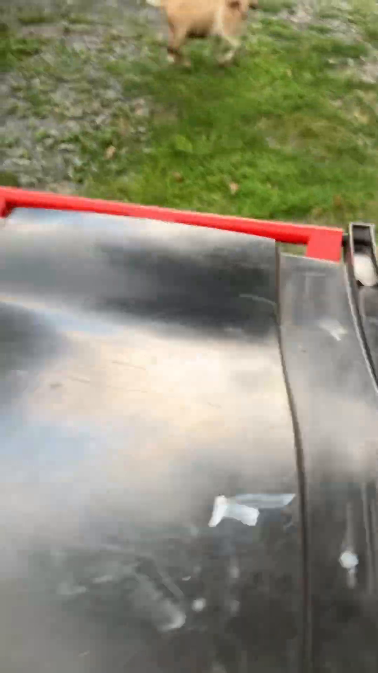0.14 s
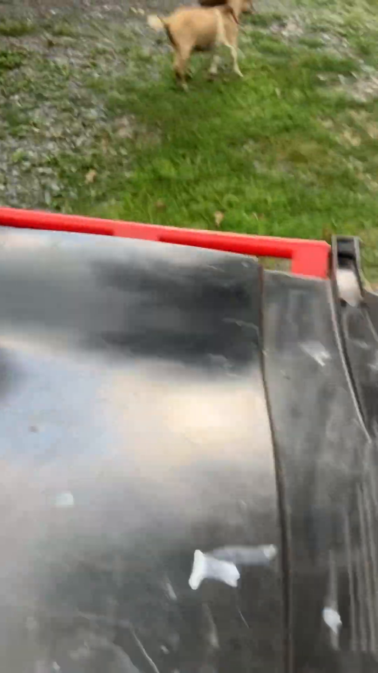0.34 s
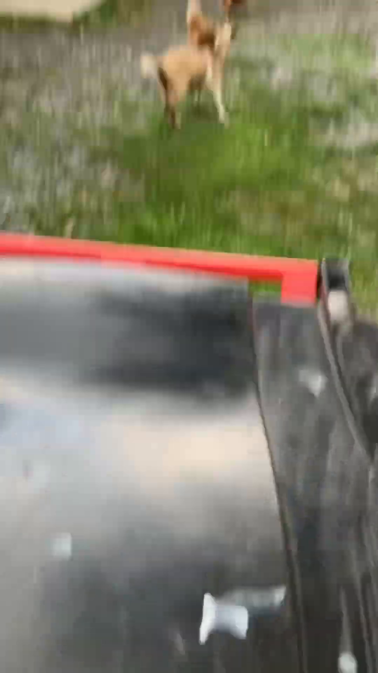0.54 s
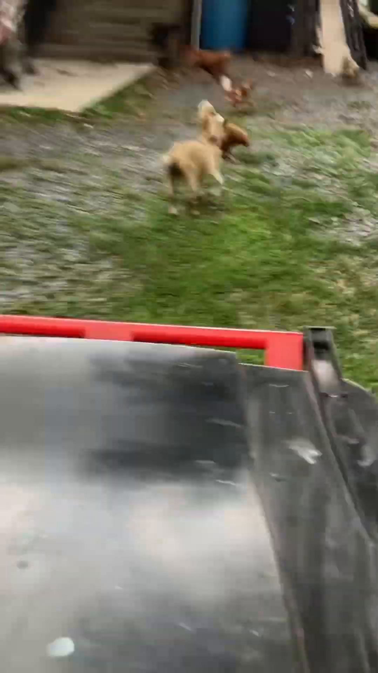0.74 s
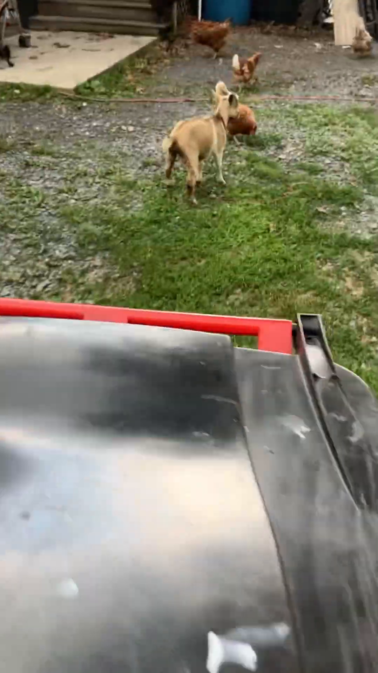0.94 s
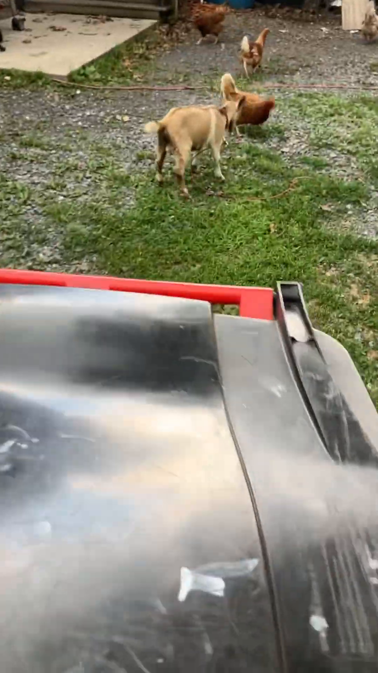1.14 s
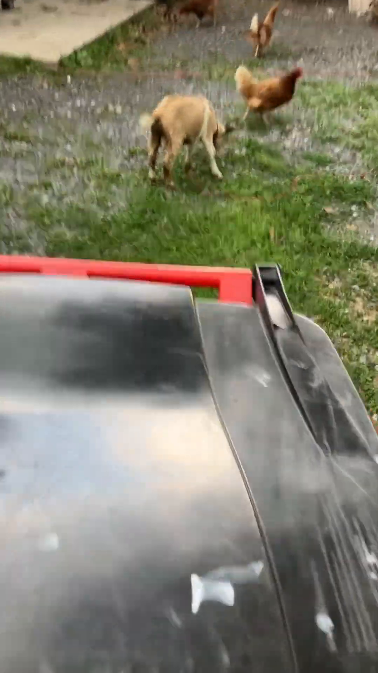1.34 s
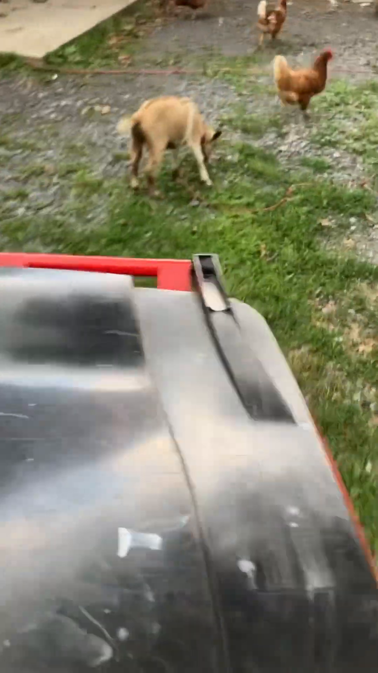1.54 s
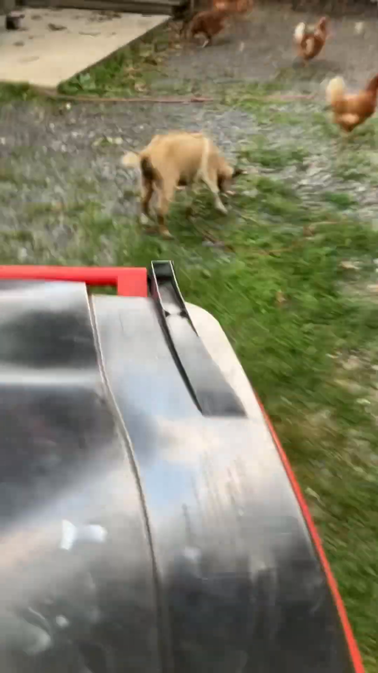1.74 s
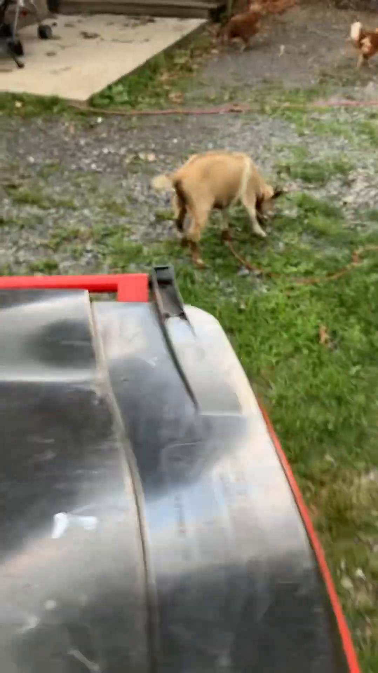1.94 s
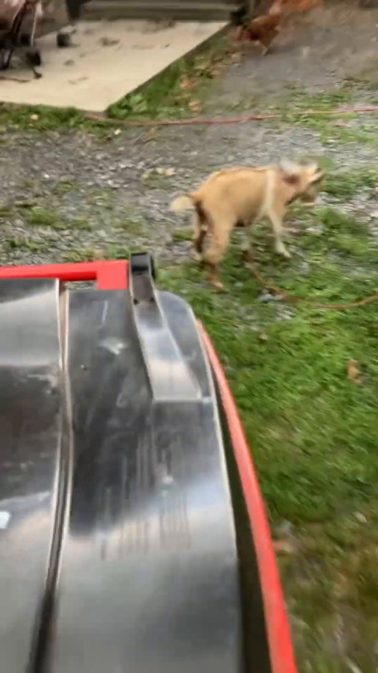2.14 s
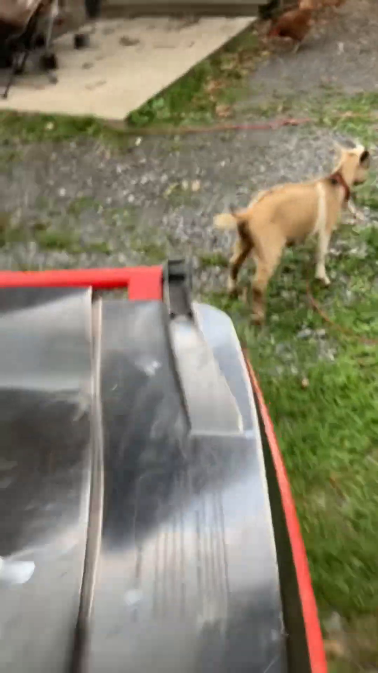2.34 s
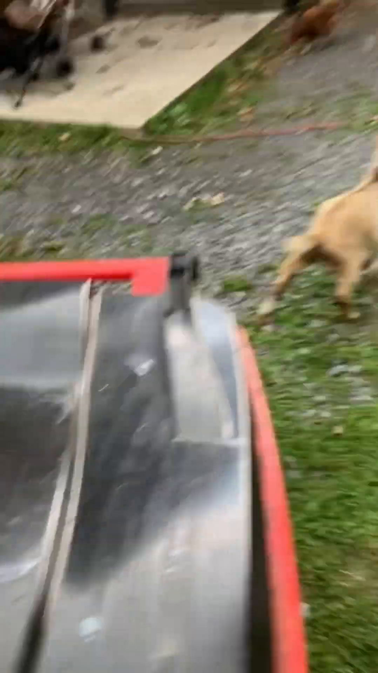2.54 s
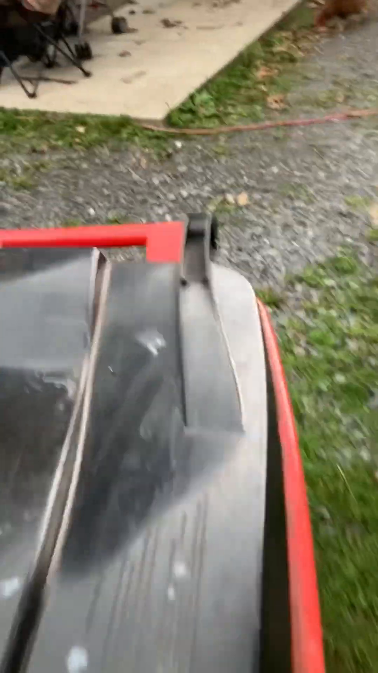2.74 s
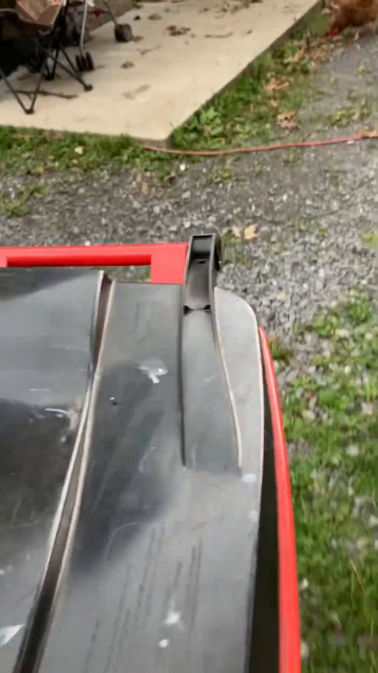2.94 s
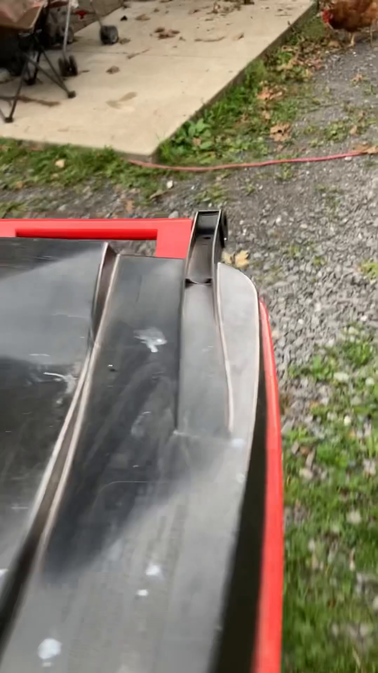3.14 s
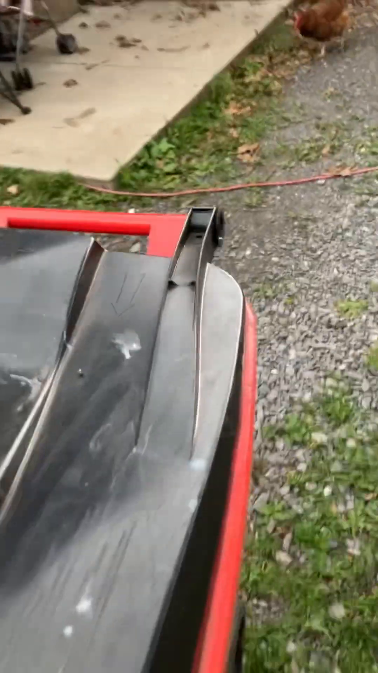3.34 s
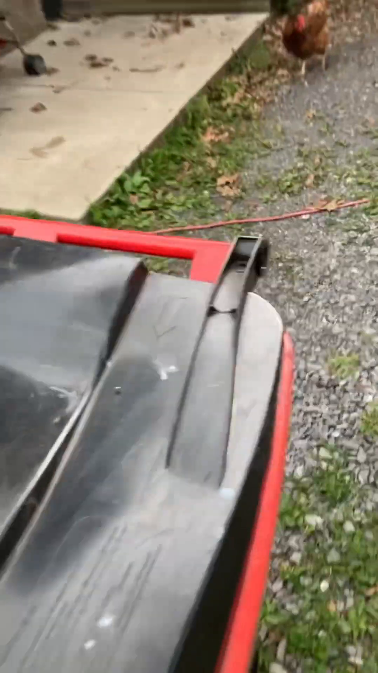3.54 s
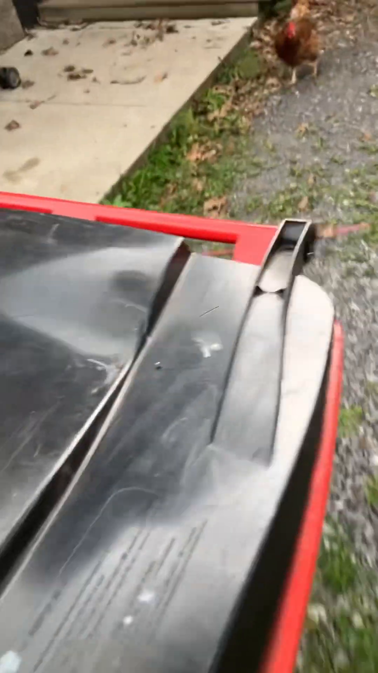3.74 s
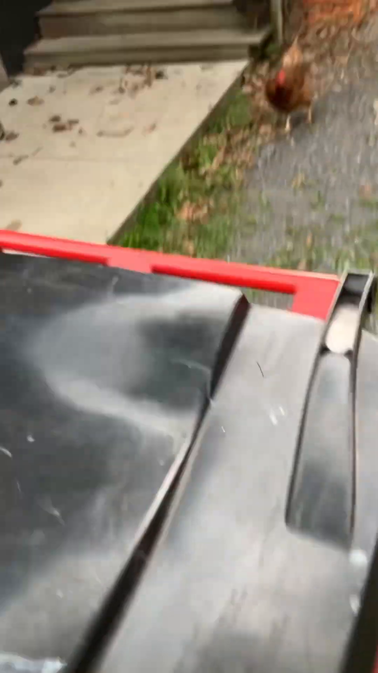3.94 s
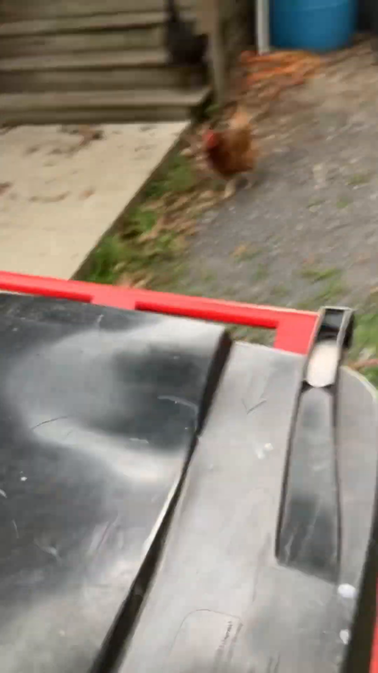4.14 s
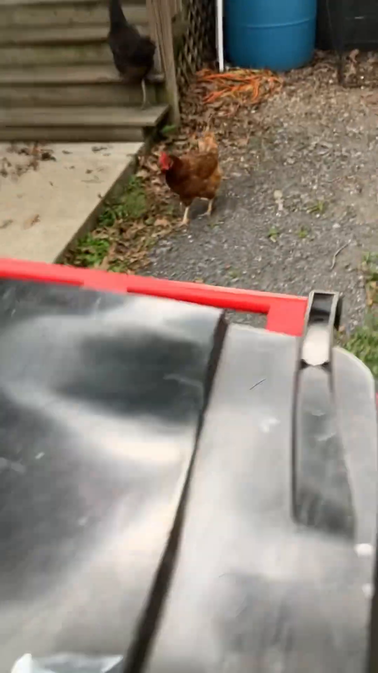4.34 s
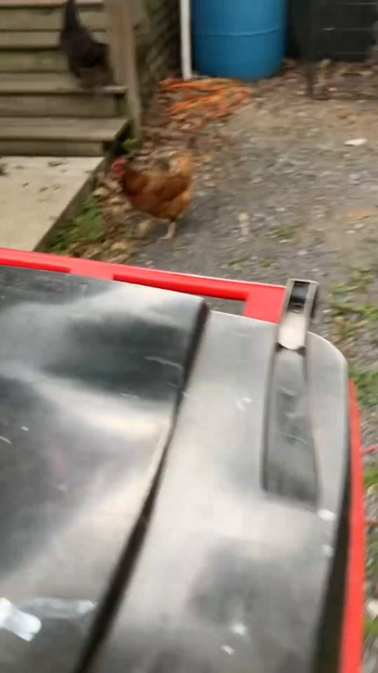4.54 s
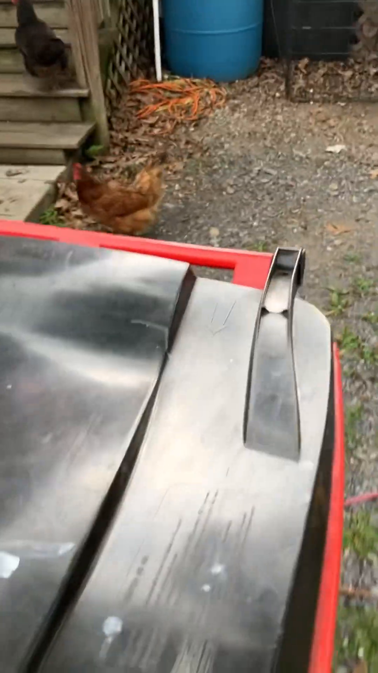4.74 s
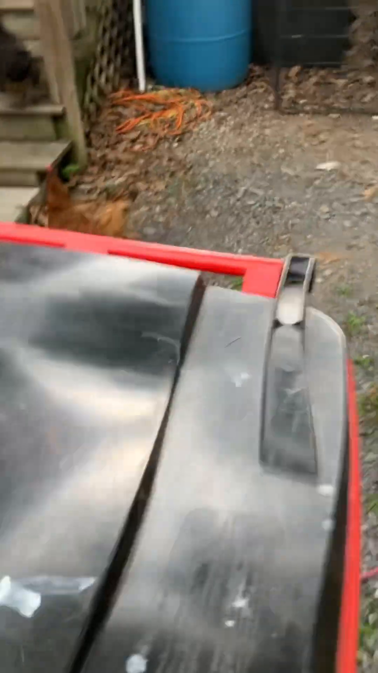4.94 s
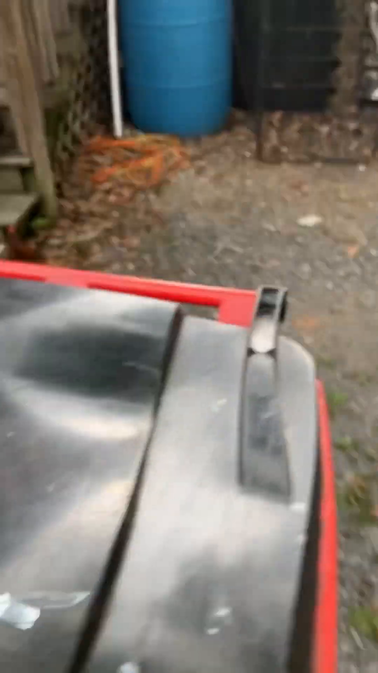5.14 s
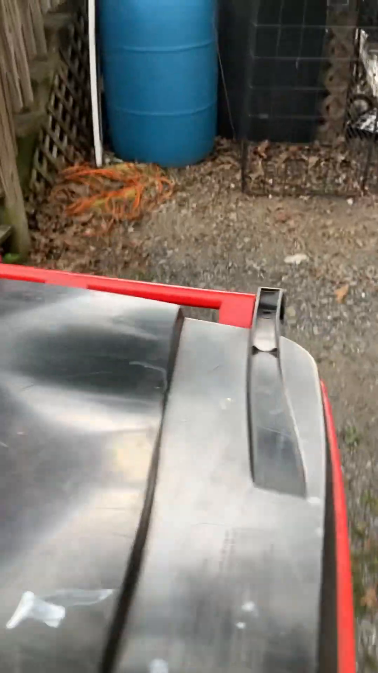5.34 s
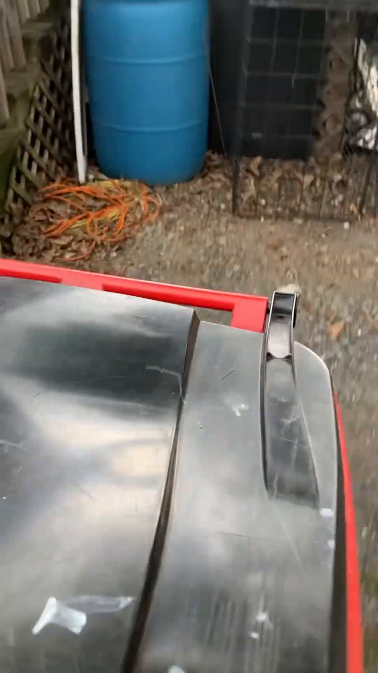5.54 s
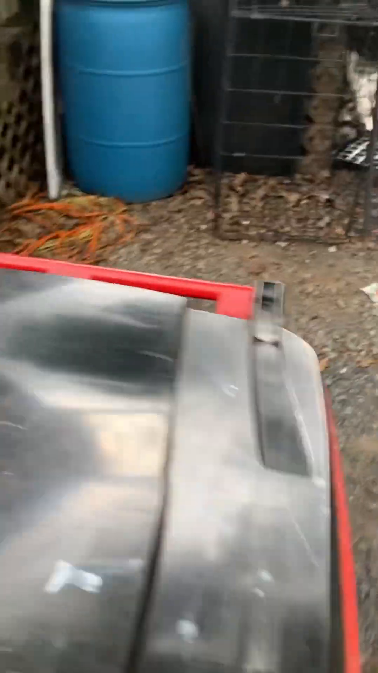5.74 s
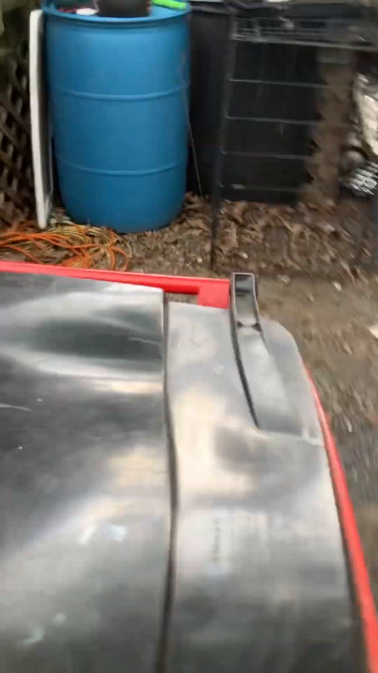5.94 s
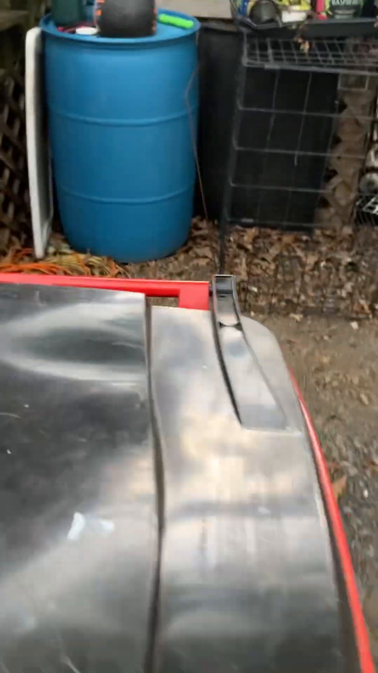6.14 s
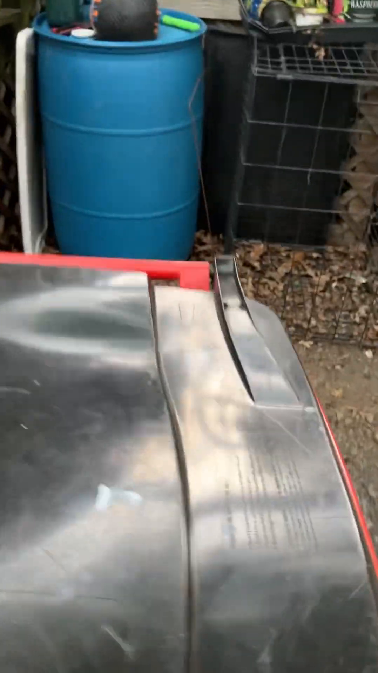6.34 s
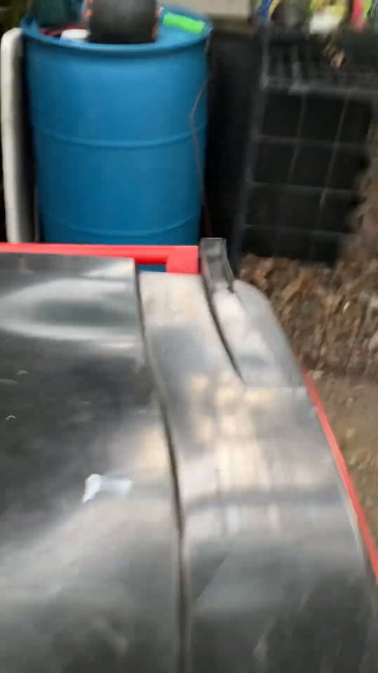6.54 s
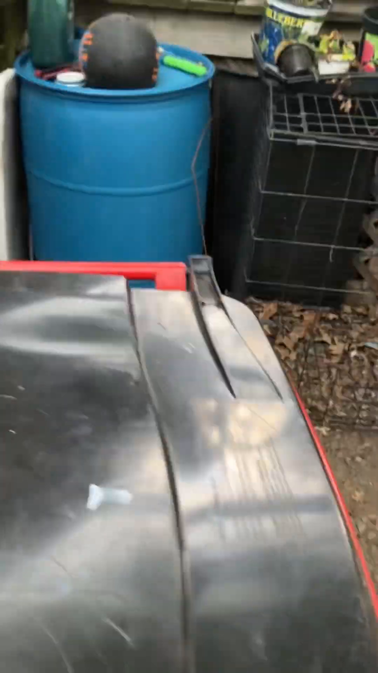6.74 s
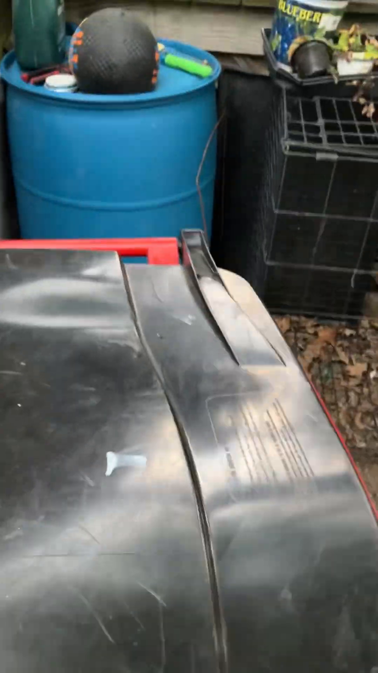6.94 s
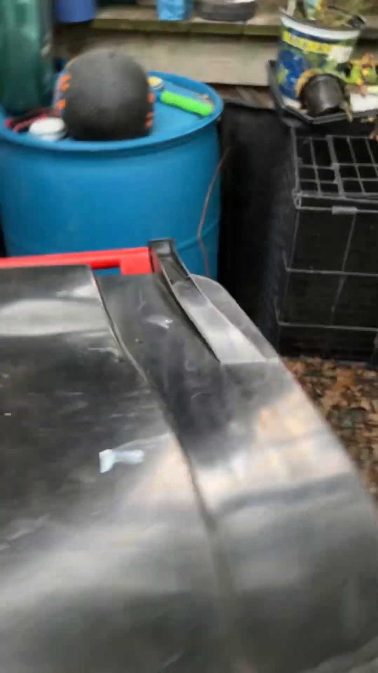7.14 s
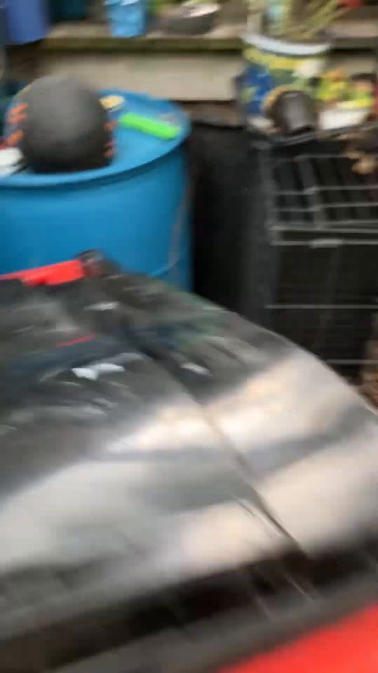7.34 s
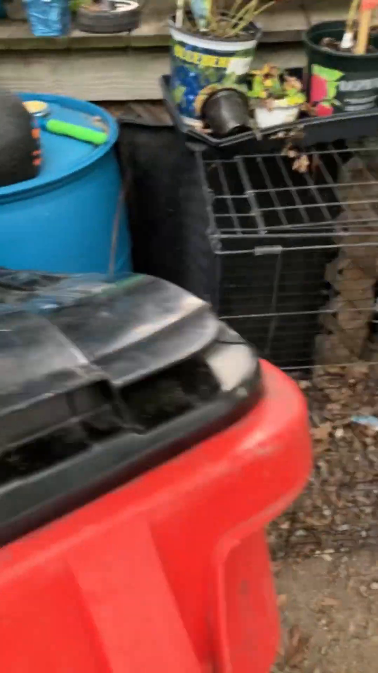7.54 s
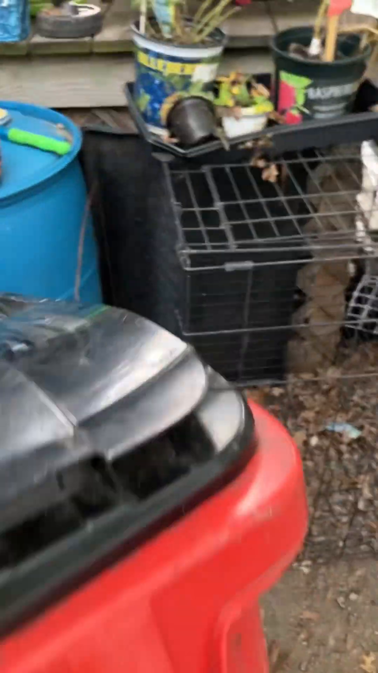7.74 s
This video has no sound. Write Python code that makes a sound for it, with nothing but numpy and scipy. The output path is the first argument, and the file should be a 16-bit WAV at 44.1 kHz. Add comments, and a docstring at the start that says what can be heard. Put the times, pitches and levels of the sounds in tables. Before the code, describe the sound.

Close, boomy rumbling of an empty plastic bin bumping over stones, with lid slaps and gritty crunching, stopping abruptly in a thud.

```python
"""A hollow plastic bin, wheeled over grass and gravel close under a phone, is then tipped upright.
Stones jolt the wheels: random impacts excite wall, air and lid resonances, and loose parts clatter.
Gravel is shaped noise that swells and snaps; lid drops and latch ticks are damped impacts,
and an axle scrape is narrow-band noise. Treble reaches the left of two microphone ports first."""
import sys
import numpy as np
from scipy import signal
from scipy.fft import rfft, irfft, next_fast_len
from scipy.io import wavfile
from scipy.ndimage import uniform_filter1d, map_coordinates

SR = 44100
rng = np.random.default_rng(int(sys.argv[2]) if len(sys.argv) > 2 else 0)


def wav_out(sig):
    """Save sig, one row per channel (or a flat mono array), as 16-bit PCM at SR to the path in sys.argv[1]."""
    wavfile.write(sys.argv[1], SR, np.round(np.clip(np.atleast_2d(sig).T, -1, 1) * 32767).astype(np.int16))


N = 343812


def amp(db):
    """Level definition: the amplitude gain of a level in dB."""
    return 10 ** (np.asarray(db) / 20)


def unit(x):
    """Power normalisation: x at rms 1."""
    return x / np.sqrt(np.mean(x ** 2) + 1e-20)


def evened(x, size):
    """Short-time power normalisation: steady level over spans of size samples, keeping faster grain."""
    power = uniform_filter1d(np.mean(x ** 2, axis=0), size)
    return x / np.sqrt(np.abs(power) + 1e-12)


def along(points, hz):
    """Logarithmic frequency scale: interpolates (f/Hz, value) points along it."""
    f, value = np.transpose(points)
    return np.interp(np.log(hz + 1), np.log(f + 1), value)


def curves(rows):
    """Linear interpolation in time: one curve for each column after t/s."""
    s, *columns = np.transpose(rows)
    return [np.interp(np.arange(N) / SR, s, column) for column in columns]


def wobble(rate):
    """Band-limited random fluctuation: a smooth curve through rate random knots a second."""
    return map_coordinates(rng.standard_normal(400), [np.arange(N) * rate / SR])


def filtered(x, response):
    """Linear filtering: the spectrum of x times a complex response of frequency."""
    m = next_fast_len(N + SR // 2)
    return irfft(rfft(x, m) * response(np.fft.rfftfreq(m, 1 / SR)), m)[..., :N]


def modes(table):
    """Modal superposition: damped resonators summed with alternating sign."""
    def response(f):
        total = 0
        for k, (centre, width, db) in enumerate(table):
            damping = 1j * f * width
            total = total + (-1) ** k * amp(db) * damping / (centre * centre - f * f + damping)
        return total
    return response


def impulses(s, db):
    """Impulsive excitation: one sample of the given level at each time s."""
    return np.bincount((s * SR).astype(int), amp(db), N)


def bursts(strikes, t60):
    """Exponential decay: three independent noises flare at each strike and fall 60 dB in t60 seconds."""
    flare = signal.lfilter([1], [1, -amp(-60 / (t60 * SR))], strikes)
    return flare * rng.standard_normal((3, N))


def jolts(rate, spread_db, t60, smooth):
    """Random impact process: uneven knocks, rate a second, over a smooth share of rubbing noise."""
    draw = rng.random((2, N))
    size = amp(-spread_db * np.log(draw[1] + .008))
    strikes = (draw[0] < rate / SR) * size
    return unit(bursts(strikes, t60)) + smooth * rng.standard_normal((3, N))


def swells(steady_db, s, db, rise, fall):
    """Incoherent power addition: gain of a steady level plus a swell at each s; slopes in dB/s."""
    step = 128
    late = np.arange(0, N, step) / SR - np.asarray(s)[:, None]
    slope_db = np.where(late < 0, rise * late, -fall * late)
    peaks = amp(2 * (db[:, None] + slope_db)).sum(0)
    return np.sqrt(amp(2 * steady_db) + np.interp(np.arange(N), np.arange(0, N, step), peaks))


def pings(start, hz, db, t60, size, loose=0):
    """Damped free vibration: one tone a contact, size samples long, on three channels.
    With loose at 1 the phases on the three channels are unrelated."""
    t = np.arange(size) / SR
    decay = amp(db[:, None] - 60 * t / t60[:, None])
    onset = 1 - np.exp(-t / 0.00029)
    draw = 2 * np.pi * rng.random((len(hz), 4))
    phase = draw[:, :1] + loose * draw[:, 1:]
    where = ((start * SR).astype(int)[:, None] + np.arange(size)).ravel()
    channels = []
    for k in range(3):
        tone = decay * np.sin(2 * np.pi * hz[:, None] * t + phase[:, k:k + 1]) * onset
        channels.append(np.bincount(where, tone.ravel(), N + size)[:N])
    return np.array(channels)


def rung(s, db, tones, scatter_db, t60, size):
    """Repeated modal excitation: each contact rings every tone, its pitch scattered at random."""
    total = 0
    for hz, over_db in tones:
        pitch = hz * amp(scatter_db * rng.standard_normal(len(s)))
        total = total + pings(s, pitch, db + over_db, np.full(len(s), t60), size)
    return total


# coherence of the two ports: f/Hz, share of power common to both [1]
COHERENCE = [(86, .86), (220, .99), (430, .93), (650, .6), (850, .75), (1100, .58), (2500, .5), (5000, .75),
             (7000, .88), (16000, .85)]
# phase lead of the left port over the right: f/Hz, phase/rad
PHASE_LEAD = [(0, -.06), (550, -.1), (2300, 2.4), (3200, 1.7), (5400, 3.2), (8500, 6.28), (14900, 12.56),
              (16000, 13.6)]
# level of the left port over the right: f/Hz, level/dB
LEFT_OVER_RIGHT = [(60, -0.5), (250, -1), (800, -2.5), (2500, 0)]


def ports(three, response):
    """Partial coherence: one noise reaches both ports with a phase gap, the others one port each."""
    common, left, right = three
    side = np.array([[1], [-1]])

    def share(hz):
        return np.clip(along(COHERENCE, hz), 0, 1)

    def gap(hz):
        return np.exp(.5j * side * np.interp(hz, *np.transpose(PHASE_LEAD)))

    def place(hz):
        return response(hz) * amp(side * along(LEFT_OVER_RIGHT, hz) / 2)

    both = filtered(common, lambda hz: place(hz) * gap(hz) * np.sqrt(share(hz)))
    apart = filtered(np.array([left, right]), lambda hz: place(hz) * np.sqrt(1 - share(hz)))
    return both + apart


# steady shaking between bumps, ending in the set-down: t/s, lid level/dB, wall boom level/dB
ROLLING = [(0.0, -20.5, -22), (0.8, -27, -20.5), (0.9, -34.5, -27.5), (1.0, -24.5, -20), (1.4, -24.5, -18),
           (1.95, -30.5, -28.5), (2.3, -18.5, -18.5), (2.6, -27.5, -26.5), (2.85, -19.5, -15),
           (2.93, -29, -25.5), (3.1, -21.5, -19.5), (3.6, -27.5, -24.5), (4.2, -24, -20), (4.6, -33, -24.5),
           (5.0, -22.5, -21.5), (5.28, -29.5, -28), (5.6, -29, -19), (6.0, -25.5, -21.5),
           (6.08, -49, -29.5), (6.2, -29, -22), (7.15, -28, -24), (7.33, -43, -31.5), (7.395, -52.5, -45.5),
           (7.435, -17, -15), (7.8, -86, -45.5)]
# modes of the big panels: f/Hz, width/Hz, relative level/dB
WALL_MODES = [(65, 22.4, 2.5), (84.4, 43.7, -1), (144, 37.7, -7)]


def walls():
    """Panel resonance: the jolts excite the low modes of the walls, which boom."""
    boom_db = curves(ROLLING)[1]
    boom = ports(jolts(rate=180, spread_db=4.0, t60=0.027, smooth=0.78), modes(WALL_MODES))
    return amp(boom_db) * evened(boom, size=4000)


def extra_shaking():
    """Level difference: steady lid shaking in dB over its usual -28 dB."""
    return curves(ROLLING)[0] + 28


# wheels strike larger stones, then the base lands and settles:
# t/s, cavity level/dB, lid level/dB, loose parts level/dB
IMPACTS = [(0, -5.5, -25, -47), (0.077, -10, -16, -25), (0.149, -11.5, -14, -24), (0.271, -17, -24, -34),
           (0.379, -4.5, -14.5, -27.5), (0.616, -9, -16.5, -24.5), (0.777, -14.5, -18.5, -26),
           (0.947, -23.5, -19.0, -31.5), (1.028, -17, -19.5, -42), (1.144, -27, -22, -29),
           (1.287, -16, -21, -29), (1.386, -19, -16.5, -27.5), (1.497, -16, -30, -48),
           (1.658, -15, -39, -35), (2.291, -33, -15.5, -25.5), (2.376, -13, -26, -29),
           (2.556, -38, -21.5, -33.5), (2.709, -4.5, -16.5, -30.5), (2.831, -11.5, -19.5, -28.5),
           (3.007, -15, -17, -26), (3.16, -38.0, -19, -25), (3.256, -14, -18.5, -25),
           (3.356, -12.5, -19.5, -29), (3.483, -21, -28.5, -59), (3.643, -17, -30, -32),
           (3.833, -12.5, -18, -26.5), (4.084, -44, -33, -28), (4.245, -16, -21.5, -50),
           (4.372, -10, -12, -26.5), (4.455, -10, -19.5, -31), (4.642, -15.5, -22, -34.5),
           (4.722, -25, -15, -25.5), (4.907, -14, -15, -26), (4.998, -7, -18.5, -26), (5.04, -9, -38, -46),
           (5.325, -19.5, -26, -41), (5.525, -37, -19, -28.5), (5.603, -14.5, -18.5, -31),
           (5.684, -38, -18.5, -26), (5.764, -12, -18.5, -28), (6.119, -21.5, -24.5, -34),
           (6.258, -11, -19.5, -25), (6.335, -10.5, -21, -27), (6.418, -12, -19.5, -27.5),
           (6.517, -22.5, -22, -34), (6.763, -12, -23.5, -30.5), (7.064, -24, -19, -28),
           (7.391, -59.5, -37, -31), (7.418, -19, -21.5, -23.5), (7.49, -32, -30.5, -51),
           (7.712, -35, -39.5, -44)]
# modes of the enclosed air: f/Hz, width/Hz, relative level/dB
AIR_MODES = [(194.6, 11.08, -1.5), (174, 51.4, -16)]
THRUM_DB, THRUM_GROWS = -26.5, 0.99  # level at the usual shaking; dB per dB of shaking
THUMP_RISE, THUMP_FALL, THUMP_LAG_S = 500, 454, 0.022  # dB/s, dB/s; swell after the bump, s
DRUM_WANDER_HZ, DRUM_ROUGH = 4.525, 0.53  # pitch wander; rubbing added to the ring


def cavity():
    """Cavity resonance: the air mutters unevenly and rings on one wandering note after each bump."""
    s, thump_db, _, _ = np.transpose(IMPACTS)
    hz = AIR_MODES[0][0] + DRUM_WANDER_HZ * wobble(14)
    ring = unit(np.sin(2 * np.pi * np.cumsum(hz) / SR))
    knocking = jolts(rate=180, spread_db=5.0, t60=0.023, smooth=1.0)
    rub = ports(knocking, lambda hz: modes(AIR_MODES)(hz) * hz / (hz + 300j))
    rub = evened(rub, size=4000)
    thumps = swells(np.full(N, -120), s + THUMP_LAG_S, thump_db, THUMP_RISE, THUMP_FALL)
    steady = amp(THRUM_DB + THRUM_GROWS * extra_shaking())
    return steady * rub + thumps * unit(ring + DRUM_ROUGH * rub)


SHAKE_RISE, SHAKE_FALL = 580, 135  # lid and loose parts at a bump, dB/s
# modes of the lid: f/Hz, width/Hz, relative level/dB
LID_MODES = [(281.6, 63, -2), (343.8, 45.7, -0.5), (385.6, 41.6, -1), (481.3, 88.6, -4.5),
             (550.7, 119, -7.5), (858, 155, -14)]


def lid():
    """Plate resonance: random contacts excite the modes of the lid, which rattles."""
    s, _, lid_db, _ = np.transpose(IMPACTS)
    rattle = ports(jolts(rate=300, spread_db=2.0, t60=0.034, smooth=0.92), modes(LID_MODES))
    return swells(curves(ROLLING)[0], s, lid_db, SHAKE_RISE, SHAKE_FALL) * evened(rattle, size=3000)


# spectrum of the loose parts: f/Hz, relative level/dB
CLATTER_COLOUR = [(400, -19), (900, -3.5), (1500, -7.5), (2200, -14.5), (3000, -19.5), (4000, -26.5),
                  (8000, -40), (16000, -78)]


def chatter(clumps, count):
    """Clustered impacts: parts and stones knock in clumps of count; above 900 Hz, the higher the fainter."""
    late, pitch, size, life = rng.random((clumps * count, 4)).T
    clump_start = np.repeat(rng.random(clumps) * N / SR, count)
    when = np.minimum(clump_start - .02 * np.log(late + 1e-9), (N - 1) / SR)  # mean delay about 20 ms
    hz = 600 * amp(18 * pitch)
    db = along(CLATTER_COLOUR, hz) - 3 * np.log(size + .04)
    return ports(pings(when, hz, db, .008 + .022 * life, size=500, loose=1), np.ones_like)


CLATTER_DB, CLATTER_GROWS = -41, 1.3  # level at the usual shaking; dB per dB of shaking


def loose_parts():
    """Multiple impact: shaped noise bursts and clustered pings grow with the shaking."""
    s, _, _, loose_db = np.transpose(IMPACTS)
    knocking = jolts(rate=220, spread_db=0.5, t60=0.034, smooth=0.6)
    noise = ports(knocking, lambda hz: amp(along(CLATTER_COLOUR, hz)))
    clatter = unit(noise) + amp(4) * unit(chatter(clumps=500, count=10))
    steady_db = CLATTER_DB + CLATTER_GROWS * extra_shaking()
    return swells(steady_db, s, loose_db, SHAKE_RISE, SHAKE_FALL) * evened(clatter, size=3000)


# gravel shifts under wheel or shoe: t/s, level/dB before a random wander
SHIFTS = [(0.036, -40), (0.157, -40), (1.124, -45), (1.575, -38), (1.702, -38), (2.607, -46.5),
          (2.772, -42.5), (3.697, -44.5), (4.21, -42.5), (4.615, -39), (4.743, -37), (5.275, -42),
          (5.885, -46), (6.59, -43.5), (6.777, -40.5), (6.937, -36), (7.052, -40.5), (7.396, -41.5),
          (7.715, -52)]
# spectrum of grinding gravel: f/Hz, relative level/dB
GRIT_COLOUR = [(800, -59), (2500, 2.5), (5000, -5), (8500, 3.5), (11500, -4.5), (16000, -6.5)]
CRUNCH_DB, CRUNCH_GROWS = -55, 0.1  # level at the usual shaking; dB per dB of shaking
SCUFF_RISE, SCUFF_FALL = 380, 190  # dB/s
STOP_S, STILL_DB = 7.45, -5  # the bin stands and the steady gravel quietens


def gravel():
    """Granular friction: dense impacts of stones grind and swell under wheels and shoes."""
    steady_db = CRUNCH_DB + CRUNCH_GROWS * extra_shaking()
    steady_db = steady_db + STILL_DB * (np.arange(N) > STOP_S * SR)
    crunch = swells(steady_db, *np.transpose(SHIFTS), SCUFF_RISE, SCUFF_FALL)
    crunch = crunch * amp(1.66 * wobble(4.3))
    stones = evened(jolts(rate=200, spread_db=2.5, t60=0.019, smooth=0.86), size=5000)
    return crunch * unit(ports(stones, lambda hz: amp(along(GRIT_COLOUR, hz))))


# the lid drops dully on the rim: t/s, reference level/dB
LID_DROPS = [(0.046, -26), (2.098, -15.5), (2.278, -9), (2.471, -24), (2.611, -16.5), (2.803, -10.5),
             (3.757, -20), (4.688, -13.5), (4.726, -27.5), (4.927, -15.5), (6.476, -19), (6.517, -17),
             (7.408, -11.5)]
# tones of a drop: f/Hz, level/dB over the reference
RIM_TONES = [(525, -3.5), (835, -7)]


def knocks():
    """Damped modal impact: each drop of the lid rings two dull, quickly fading tones."""
    s, db = np.transpose(LID_DROPS)
    return ports(rung(s, db, RIM_TONES, scatter_db=0.39, t60=0.071, size=1500), np.ones_like)


# lid and latch ticks: t/s, excitation level/dB
SLAPS = [(0.101, -22), (0.139, -21), (0.166, -14.5), (0.3315, -23), (0.423, -26.5), (0.617, -33),
         (0.7014, -31), (0.951, -24.5), (1.2745, -26.5), (1.523, -35), (2.035, -34), (2.189, -42),
         (2.23, -21.5), (2.2774, -30.5), (2.305, -23.5), (2.358, -27.5), (2.499, -33.5), (2.5318, -24.5),
         (2.6434, -31.5), (2.799, -24.5), (2.814, -21), (3.124, -25.5), (3.144, -26), (3.254, -18),
         (3.635, -27.5), (3.756, -32), (3.805, -25.5), (4.055, -34), (4.359, -29), (4.392, -24.5),
         (4.4789, -27.5), (4.896, -25.5), (4.9701, -28), (5.189, -39.5), (5.5187, -31), (5.552, -28.5),
         (5.641, -28), (5.6677, -32.5), (5.7046, -26.5), (6.1102, -37.5), (6.251, -27), (6.257, -26.5),
         (6.286, -30), (6.41, -30), (6.546, -31.5), (6.618, -28), (6.639, -30.5), (6.7612, -27),
         (7.079, -29)]
# modes of the latch: f/Hz, width/Hz, relative level/dB
LATCH_MODES = [(840, 314, 14), (1910, 1040, 5.5), (2870, 216, 9), (4500, 850, -6), (8200, 2200, -11.5)]
# brief metallic ring with each tick: f/Hz, level/dB over the excitation
TICK_RING_TONES = [(3100, -5.5), (4050, -12)]


def ticks():
    """Impact excitation: slapping plastic cracks through the latch, shudders and pings briefly."""
    s, db = np.transpose(SLAPS)
    slaps = impulses(s, db)
    crack = bursts(slaps, t60=.012)
    shudder = amp(-8.5) * bursts(slaps, t60=0.13)
    ping = rung(s, db, TICK_RING_TONES, scatter_db=0.28, t60=0.021, size=800)
    return amp(6) * ports(crack + shudder, modes(LATCH_MODES)) + ports(ping, np.ones_like)


# a wheel scrapes on its axle: t/s, level/dB
SCRAPES = [(.772, -31), (.835, -46.5)]
# axle resonance: f/Hz, width/Hz, relative level/dB
AXLE_MODE = [(2400, 200, 0)]


def squeak():
    """Resonant friction: plastic scraping on its axle is noise in one narrow band."""
    scrape = unit(ports(rng.standard_normal((3, N)), modes(AXLE_MODE)))
    return swells(np.full(N, -120), *np.transpose(SCRAPES), 1500, 200) * scrape


# single stones snap: t/s, excitation level/dB
STONE_SNAPS = [(0.9992, -27.5), (1.101, -29), (2.7305, -21), (2.853, -36.5), (3.173, -35), (3.7007, -26),
               (4.5927, -36.5), (4.6842, -23.5), (5.518, -27), (5.681, -23), (7.5417, -31.5)]


def snaps():
    """Impulsive fracture: a stone cracks in a few milliseconds, with the colour of the gravel."""
    cracks = bursts(impulses(*np.transpose(STONE_SNAPS)), t60=0.0054)
    return ports(cracks, lambda hz: amp(along(GRIT_COLOUR, hz)))


def scene():
    """Linear superposition: the bin, the gravel and the single impacts add."""
    bin_body = walls() + cavity() + lid() + loose_parts()
    return bin_body + gravel() + knocks() + ticks() + squeak() + snaps()


def record(dry):
    """Saturation and band limiting: the phone rounds off peaks, thins deep bass and cuts the top."""
    soft = dry / (1 + np.abs(dry / .95) ** 6) ** (1 / 6)
    return filtered(soft, lambda hz: (hz < 15870) * hz / (hz - 30j))  # bass corner 30 Hz


dry = scene()
out = record(dry)
wav_out(out)
```